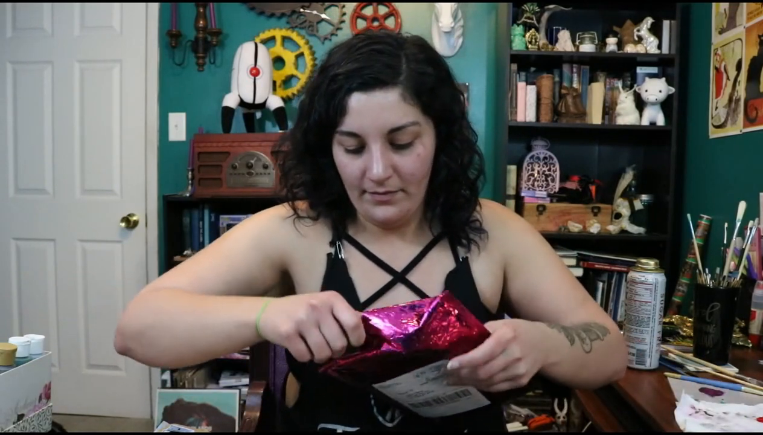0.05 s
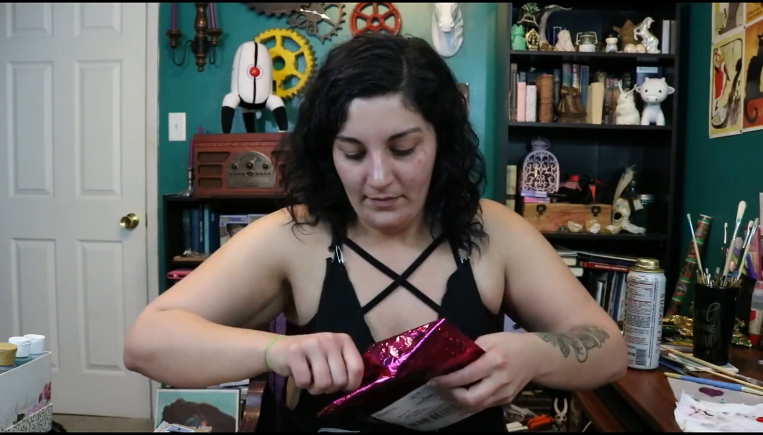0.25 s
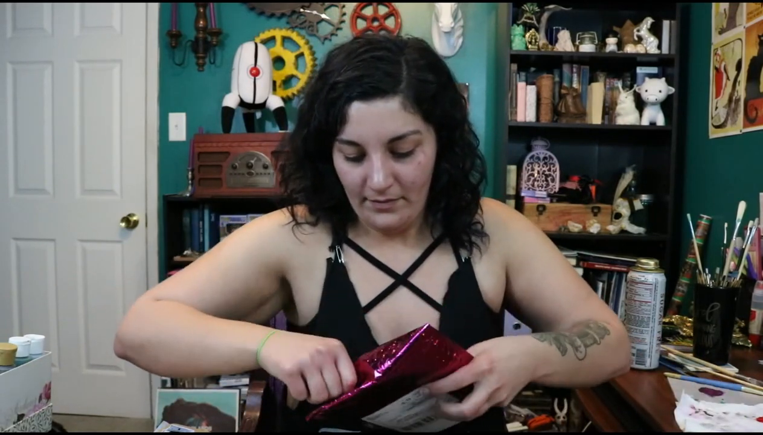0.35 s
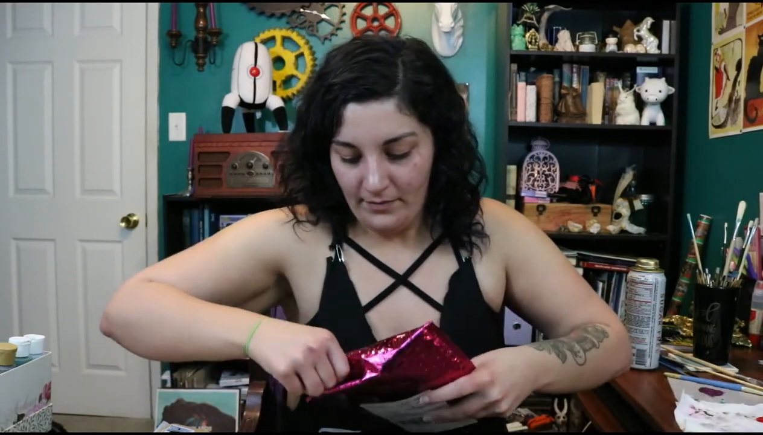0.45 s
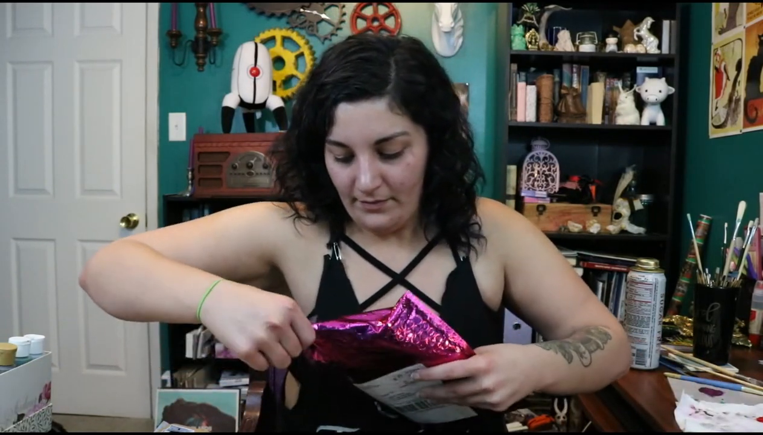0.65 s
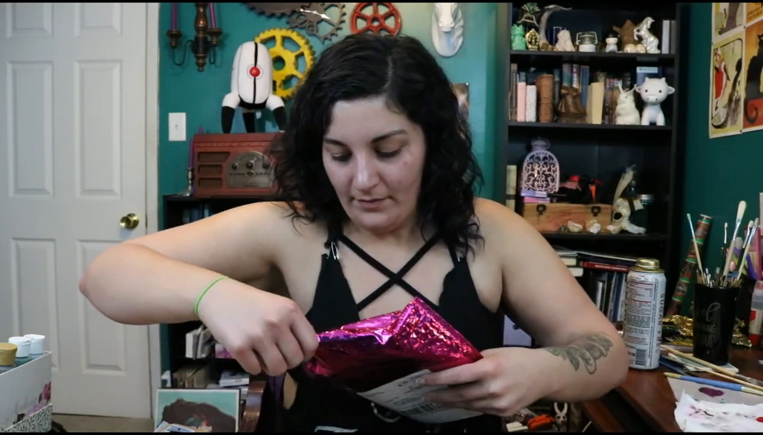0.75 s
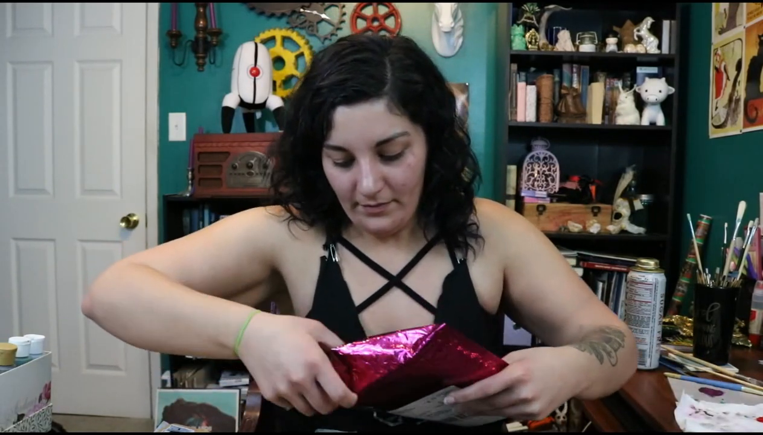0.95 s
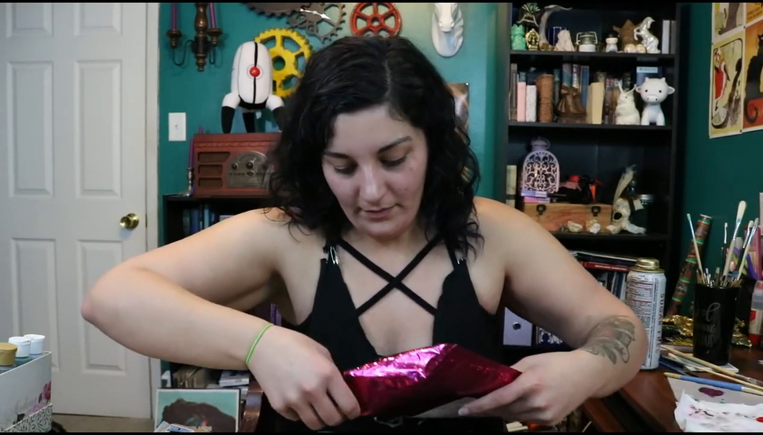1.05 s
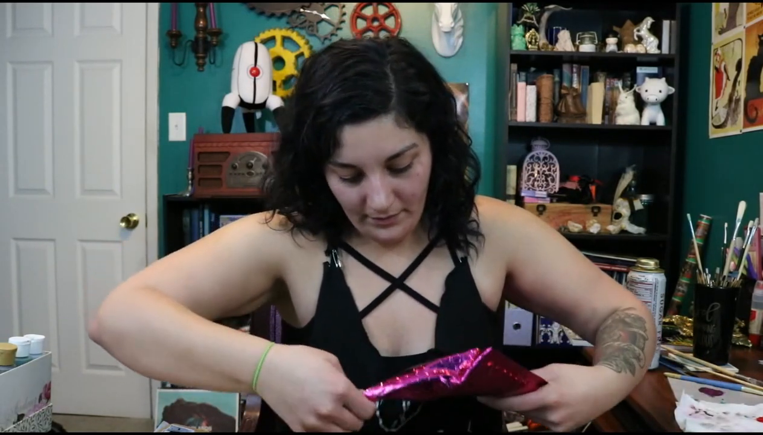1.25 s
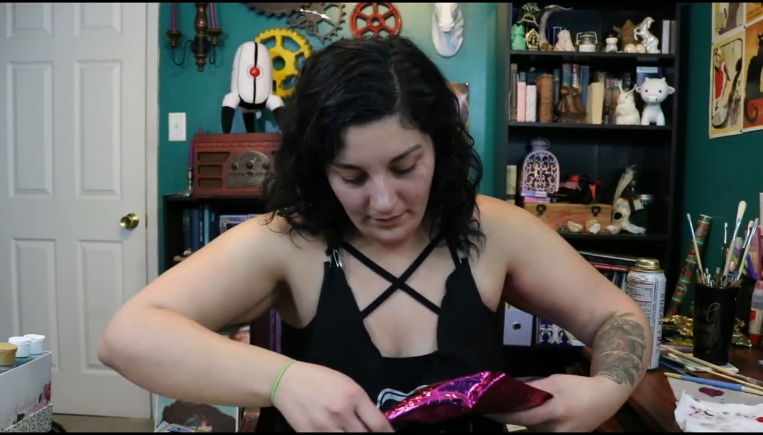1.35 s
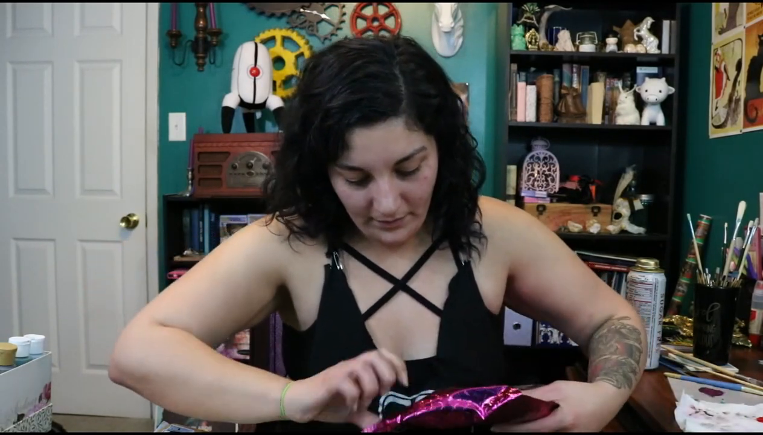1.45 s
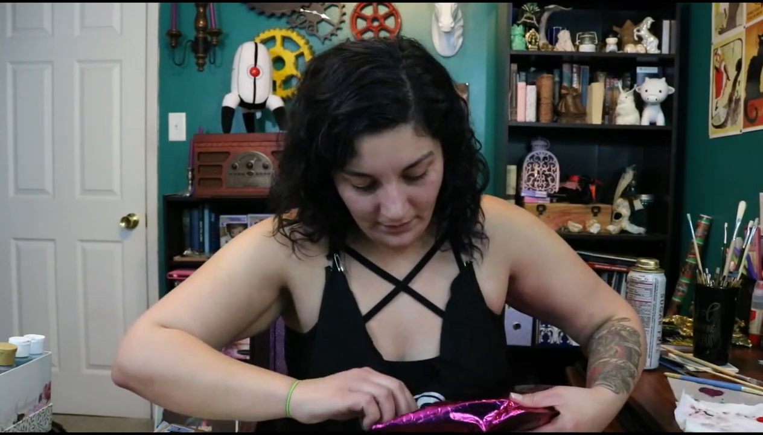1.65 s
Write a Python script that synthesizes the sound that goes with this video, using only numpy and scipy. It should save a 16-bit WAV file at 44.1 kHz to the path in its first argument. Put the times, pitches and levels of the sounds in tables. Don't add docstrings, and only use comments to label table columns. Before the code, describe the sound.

Hands crumple a shiny padded plastic mailer close to a stereo microphone in a small quiet room; scattered snaps, then a hard yank opens the seal with a dense loud crackle, followed by lighter crinkling.

```python
import sys
import numpy as np
from scipy import signal
from scipy.fft import rfft, irfft, next_fast_len
from scipy.io import wavfile
from scipy.ndimage import map_coordinates

SR = 44100
rng = np.random.default_rng(int(sys.argv[2]) if len(sys.argv) > 2 else 0)


def dump_mix(stems):
    frames = np.atleast_2d(stems).T
    limited = np.clip(frames, -1, 1)
    pcm = np.round(limited * 32767).astype(np.int16)
    wavfile.write(sys.argv[1], SR, pcm)


def invert_db(x):
    u = np.asarray(x, float) / 20
    return 10 ** u


N = 74970

# frequency in Hz, likeness 0 to 1.
LIKENESS = [(60, 0.68), (240, 1), (950, 0.4), (3770, 0.19), (15000, 0.036)]


def unit(x):
    return x / np.sqrt(np.mean(x ** 2) + 1e-20)


def along(points, hz):
    f, v = np.transpose(points)
    return np.interp(np.log(hz + 1), np.log(f + 1), v)


def wobble(rate_hz):
    return map_coordinates(rng.standard_normal(N // 100), [np.arange(N) * rate_hz / SR])


def filtered(x, response):
    size = next_fast_len(N + SR // 2)
    spectrum = rfft(x, size) * response(np.fft.rfftfreq(size, 1 / SR))
    return irfft(spectrum, size)[..., :N]


def scatter(start_s, shapes):
    first = np.round(np.asarray(start_s) * SR).astype(int)
    at = first[:, None] + np.arange(shapes.shape[1])
    return np.bincount(at.ravel(), shapes.ravel(), N + SR)[:N]


def flicks(hz, t60_cycles, size):
    turns = np.arange(size) / SR * hz[:, None]
    swell = 1 - np.exp(-turns / 0.6)
    return 2.9 * np.sin(2 * np.pi * turns) * invert_db(-60 * turns / t60_cycles) * swell


def spread(pair, likeness):
    def mix(hz):
        angle = np.arccos(np.clip(along(likeness, hz), -1, 1)) / 2
        return np.array([np.cos(angle), np.sin(angle)])

    mid, side = filtered(pair, mix)
    return np.array([mid + side, mid - side])


def air():
    # frequency in Hz, level in dB per Hz.
    tone_colour = [(12, -50), (20, -13), (80, -10), (125, -0.5), (282, -2), (400, 2), (520, 3), (880, -120)]
    tone = filtered(rng.standard_normal((2, N)), lambda hz: invert_db(along(tone_colour, hz)))
    return invert_db(-53.5) * unit(spread(tone, [(30, 0.8), (300, 0.66)]))


def room(x):
    # frequency in Hz, t60 in s.
    tail_t60 = [(200, 0.47), (2000, 0.24), (6000, 0.28), (14000, 0.041)]
    # delay in s, level in dB.
    early = [(.001, -3.5), (.0018, -9), (.006, -8), (.008, -11)]
    tail_db, tail_delay_samples = -5.5, 130
    hz, t, z = signal.stft(rng.standard_normal((2, SR // 2)), SR, nperseg=256)
    decay = invert_db(-60 * t / along(tail_t60, hz)[:, None])
    tail = signal.istft(z * decay, SR, nperseg=256)[1]
    after = N - tail_delay_samples - tail.shape[1]
    tail = spread(np.pad(tail, ((0, 0), (tail_delay_samples, after))), LIKENESS)
    answer = invert_db(tail_db) * tail / np.linalg.norm(tail[0])
    for delay_s, db in early:
        at_s = delay_s * np.exp(rng.normal(0, 0.096)) + abs(rng.normal(0, 0.00008, 2))
        answer[[0, 1], np.round(at_s * SR).astype(int)] += invert_db(db)
    return signal.fftconvolve(x[None], answer, axes=1)[:, :N]


def hands():
    # time in s, effort in dB, brightness at the top in dB, pocket drive in dB.
    grip = [(0, -35.5, -8, -7.5), (.09, -32.5, 6, -4), (.2, -35.5, 5, -10), (.32, -39, 11.5, -3),
            (.39, -32.5, 5.5, -5.5), (0.497, -35, 7.5, -11), (0.546, -17.5, -10.5, -11),
            (0.607, -21.5, -5.5, -7), (0.702, -28.5, 1, -8), (.79, -38.5, -9, -17), (.87, -37.5, -4, -1),
            (0.941, -32.5, 4.5, -6), (1.056, -40, 6, -0.5), (1.196, -27.5, 4.5, -7.5),
            (1.339, -46.5, 12.5, -13), (1.407, -32.5, -3, -0.5), (1.62, -42, 4, -12.5), (1.7, -44, 14.5, 8)]
    s, *columns = np.transpose(grip)
    return [np.interp(np.arange(N) / SR, s, column) for column in columns]


def crinkle():
    # frequency in Hz, level in dB per Hz.
    film = [(530, -19), (900, -2), (1370, 0.5), (5040, -5), (7580, -10.5), (13500, -22), (16000, -31)]
    grains_per_s, grain_cycles, grain_spread_db = 2000, 6, 4.2
    grain_hz, grain_octaves = 3500, 1.1
    crackle_db, rustle_db = -8, -2.5
    clump_db, flutter_db = 1, 0.79
    effort_db, bright_db, _ = hands()

    luck = rng.random((2, 6000, 3))
    used = np.clip(grains_per_s * N / SR - np.arange(luck.shape[1]), 0, 1)
    beds = []
    for when, pitch, big in luck.transpose(0, 2, 1):
        hz = np.clip(grain_hz * 2 ** (grain_octaves * (pitch * 4 - 2)), 500, 16000)
        size = used * invert_db(-grain_spread_db * np.log(big + 0.09)) * np.sqrt(hz / grain_hz)
        beds.append(scatter(when * N / SR, size[:, None] * flicks(hz, grain_cycles, size=200)))

    def film_response(hz):
        return invert_db(along(film, hz))

    def grain_response(hz):
        return film_response(hz) * np.sqrt(np.clip(hz / grain_hz, 0.2, 4.5))

    crackle = unit(filtered(np.array(beds), grain_response))
    rustle = unit(filtered(rng.standard_normal((2, N)), film_response))
    bed = invert_db(crackle_db) * crackle + invert_db(rustle_db) * rustle
    top = filtered(bed, lambda hz: hz ** 2 / (hz ** 2 + 6000 ** 2))
    bed = bed + (invert_db(bright_db) - 1) * top
    level_db = effort_db + clump_db * wobble(44.8) + flutter_db * wobble(160)
    return spread(bed, LIKENESS) * invert_db(level_db)


def pocket():
    # frequency in Hz, width in Hz, level in dB.
    pocket_modes = [(321, 93, -10.5), (417.2, 22.6, 3.5), (437.4, 37.3, -0.5), (522, 20, 2.5),
                    (566.5, 30, -1), (661, 56, -8), (792, 79, -8)]
    # start in s, peak in dB, pitch in Hz.
    buckles = [(0.05, -22.5, 503), (0.091, -22, 480), (0.12, -24, 467), (0.15, -24, 530), (0.222, -20, 465),
               (0.264, -26.5, 447), (0.358, -25, 522), (0.395, -25, 522), (0.515, -21, 515),
               (0.59, -24, 528), (0.887, -23.5, 530), (0.936, -17.5, 489), (1.021, -30, 590),
               (1.086, -27.5, 405), (1.121, -23, 502), (1.144, -22, 557), (1.135, -25.5, 345),
               (1.408, -22, 402), (1.366, -29, 485), (1.407, -22, 513), (1.466, -31.5, 570),
               (1.537, -29, 523)]
    hum_db, push_db, ring_db = -4, 9, -6
    push_t60_s, push_rise_s = 0.022, 0.0042
    effort_db, _, drive_db = hands()

    def resonance(f):
        total = 0
        for k, (hz, width_hz, db) in enumerate(pocket_modes):
            band = 1j * f * width_hz
            total = total + (-1) ** k * invert_db(db) * band / (hz * hz - f * f + band)
        return total

    drive = rng.standard_normal(N) * invert_db(2.2 * wobble(40))
    scale = np.sqrt(np.mean(filtered(drive, resonance) ** 2))
    hum = filtered(drive * invert_db(effort_db + drive_db + hum_db), resonance) / scale

    s, db, hz = np.transpose(buckles)
    t = np.arange(SR // 5) / SR
    envelope = invert_db(-60 * t / push_t60_s) * (1 - np.exp(-t / push_rise_s))
    push = np.sin(2 * np.pi * hz[:, None] * t) * envelope
    push = scatter(s, invert_db(db + push_db)[:, None] * push)
    return hum + push + invert_db(ring_db) * filtered(push, resonance)


def gape():
    # peak time in s, frequency in Hz, level in dB, t60 in s.
    mouth = [
        (.6, 567, -22, .3),
        (.562, 780, -28, .08),
        (.61, 795, -29, .09),
        (.612, 415, -30, .09),
    ]
    rise_s = 0.017
    t = np.arange(N) / SR
    total = 0
    for peak_s, hz, db, t60_s in mouth:
        before, after = np.minimum(t - peak_s, 0), np.maximum(t - peak_s, 0)
        swell = np.exp(-(before / rise_s) ** 2) * invert_db(-60 * after / t60_s)
        level = invert_db(db + wobble(40))
        total = total + level * swell * np.sin(2 * np.pi * hz * t + 0.4 * wobble(30))
    return total


def snaps():
    # start in s, peak in dB, pitch in Hz, fizz in dB.
    creases = [(0.0507, -1, 3490.0, -34), (0.0509, -9, 1350, -30), (0.0517, -7, 5200, -28),
               (0.0884, -16, 1210.0, -19), (0.1602, -13, 2100, -12), (0.1663, -18, 5810.0, -8),
               (0.2431, -15, 3450.0, -13), (0.2585, -12, 4780.0, -18), (0.2624, -15, 1980.0, -18),
               (0.3648, -18, 5040.0, -12), (0.3863, -17, 2890.0, -21), (0.4019, -10, 7600, -19),
               (0.4617, -20, 5560, -8), (0.8153, -23, 2100, -14), (0.8874, -17, 6500, -9),
               (0.8947, -22, 7490.0, -8), (0.915, -22, 2280.0, -16), (0.9501, -15, 3200, -23),
               (1.0224, -15, 2800, -11), (1.0952, -25, 5120.0, -8)]
    yank = [(0.5082, -11, 2290, -23), (0.5274, -9, 2840.0, -17), (0.5344, -11, 3490.0, -9),
            (0.5376, -9, 3830.0, -10), (0.5444, -3, 2540.0, -16), (0.5468, -9, 2370.0, -13),
            (0.5503, -1, 3600, -12), (0.5563, -4, 2300, -24), (0.5588, 0, 3300, -24),
            (0.5628, -6, 2580.0, -21), (0.5654, -8, 1560, -18), (0.568, -10, 2240.0, -16),
            (0.5796, -8, 2840.0, -18), (0.5916, -8, 3100, -20), (0.596, -10, 5120.0, -14),
            (0.6061, -8, 4200, -14), (0.6128, -13, 2930.0, -10), (.6005, -11, 3900, -11),
            (.6102, -11, 2400, -13), (.6185, -14, 2100, -13), (.6255, -15, 1500, -12),
            (0.7018, -19, 1870, -23)]
    late_creases = [(1.1218, -20, 2000, -21), (1.15, -18, 1980.0, -18), (1.1783, -14, 2410.0, -19),
                    (1.1798, -2, 3830.0, -26), (1.1911, -9, 3140.0, -16), (1.1922, -14, 4130, -17),
                    (1.1952, -13, 3300, -19), (1.2033, -13, 6200.0, -21), (1.2557, -16, 4650, -9),
                    (1.3828, -22, 2840.0, -18), (1.4008, -23, 4130.0, -25), (1.4047, -9, 3570.0, -29),
                    (1.4063, -10, 2000, -22), (1.4064, -9, 5900, -16), (1.4143, -16, 5900, -22),
                    (1.5721, -18, 4050.0, -30), (1.6402, -18, 1480, -12), (1.6463, -18, 9470, -10)]
    # start in s, peak in dB, pitch in Hz.
    ticks = [(0.0015, -27, 3270), (0.0129, -21, 2970), (0.0157, -26, 2950), (0.0208, -26, 1420),
             (0.0583, -10, 1530), (0.0758, -17, 3850), (0.0794, -19, 3400), (0.0902, -16, 1420),
             (0.1248, -22, 3170), (0.1404, -20, 3600), (0.148, -18, 1640), (0.2146, -21, 3880),
             (0.2222, -20, 3270), (0.282, -22, 2110), (0.3295, -23, 5360), (0.3444, -25, 4290),
             (0.3588, -21, 3620), (0.3818, -19, 3730), (0.3984, -17, 3380), (0.4183, -20, 2560),
             (0.4226, -19, 4350), (0.4266, -20, 3510), (0.4504, -23, 3880), (0.4677, -18, 4240),
             (0.4839, -21, 3730), (0.4927, -21, 3790), (0.5016, -21, 3040), (0.5139, -16, 4460),
             (0.5203, -16, 2480), (0.7349, -23, 2200), (0.7744, -26, 1640), (0.8069, -28, 2840),
             (0.8315, -27, 2200), (0.8474, -27, 1810), (0.8706, -30, 3730), (0.9241, -23, 1380),
             (0.9388, -24, 1890), (0.9569, -20, 5060), (0.9826, -22, 4070), (0.9929, -21, 2990),
             (0.9974, -24, 1850), (1.0289, -20, 1460), (1.0762, -24, 1610), (1.1286, -19, 3360),
             (1.1741, -16, 3920), (1.2304, -18, 1680), (1.2612, -20, 4220), (1.3071, -26, 3810),
             (1.3454, -29, 3550), (1.3642, -26, 2950), (1.3798, -23, 2390), (1.4678, -21, 3600),
             (1.5154, -26, 3290), (1.5284, -24, 4110), (1.5445, -26, 2780), (1.6024, -27, 3290),
             (1.6188, -30, 2800), (1.6778, -27, 4290), (1.6902, -23, 2500), (1.6989, -26, 2500)]
    partners = [(0.95, 0.74), (0.492, 0.19), (1.41, -0.23), (1.84, 0.33)]
    ring_cycles, ring_db = 6.58, 1
    fizz_t60_s, fizz_gain_db, tick_fizz_db = 0.0041, 6, -26.5
    trail_t60_s, trail_db = 0.13, -17
    thin_hz, fizz_hz, dull_hz = 900, 6500, 9000
    spots = 5

    small = [(s, db, hz, tick_fizz_db) for s, db, hz in ticks]
    s, db, hz, fizz_db = np.transpose(creases + yank + late_creases + small)
    t = np.arange(3000) / SR
    luck = rng.standard_normal((len(s), 3, len(t)))
    fizz = luck[:, :1] + luck[:, 1:]
    fizz = fizz * (invert_db(-60 * t / fizz_t60_s) + invert_db(trail_db - 60 * t / trail_t60_s))
    fizz = fizz * invert_db(db + fizz_db + fizz_gain_db)[:, None, None]
    ring = 0
    for ratio, share in partners:
        ring = ring + share * flicks(np.minimum(hz * ratio, dull_hz), ring_cycles, size=len(t))
    ring = ring * invert_db(db + ring_db)[:, None]

    def dull(f):
        return 1 / (1 + 1j * f / dull_hz - (f / dull_hz) ** 2)

    def thin(f):
        return (1j * f / (thin_hz + 1j * f)) ** 3 * dull(f)

    def bright(f):
        band = 1j * f * fizz_hz
        return band / (fizz_hz ** 2 - f * f + band) * dull(f)

    out = []
    for k in range(spots):
        at = s[k::spots]
        ports = np.array([scatter(at, fizz[k::spots, port]) for port in range(2)])
        out.append(filtered(scatter(at, ring[k::spots]), thin) + filtered(ports, bright))
    return out


def scene():
    boom = pocket() + gape()
    bed = crinkle()
    sharp = sum(spot + room(spot.mean(0)) for spot in snaps())
    return sharp + boom + bed + room(0.37 * boom + 0.043 * bed.mean(0)) + air()


def low_pass(x):
    return signal.sosfilt(signal.butter(12, 16820, fs=SR, output="sos"), x)


def record(dry):
    # frequency in Hz, left over right in dB.
    port_lean = [(60, -1.5), (240, 0), (950, -1.0), (3770, -2.5), (15000, 0.5)]
    top_hz, edge_hz = 15900, 250
    x = filtered(dry, lambda hz: invert_db(np.outer([0.5, -0.5], along(port_lean, hz))))
    x = np.clip(x, -1, 1)
    x = filtered(x, lambda hz: np.clip((top_hz - hz) / edge_hz + 0.5, 0, 1))
    return low_pass(x)


dry = scene()
out = record(dry)
dump_mix(out)
```